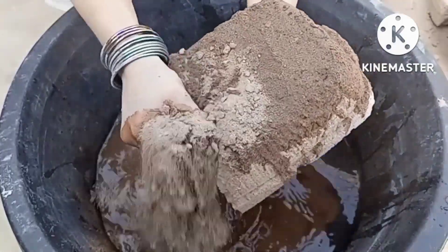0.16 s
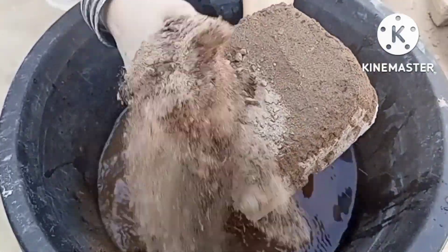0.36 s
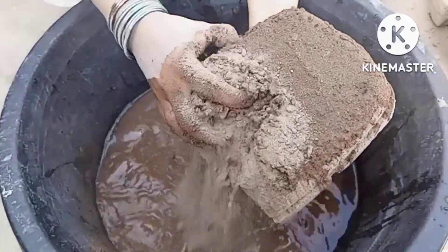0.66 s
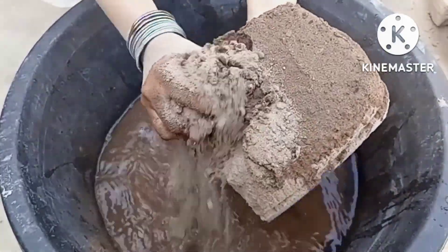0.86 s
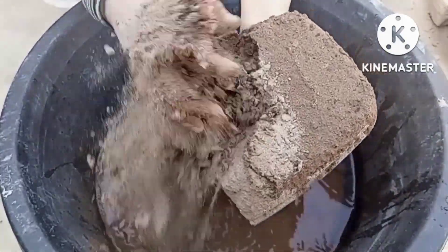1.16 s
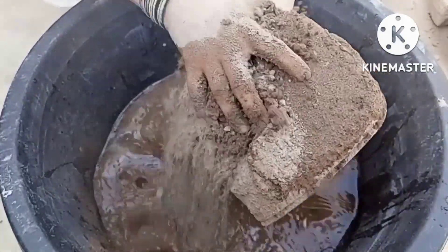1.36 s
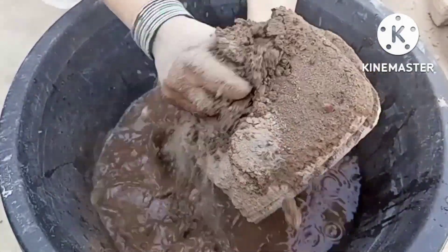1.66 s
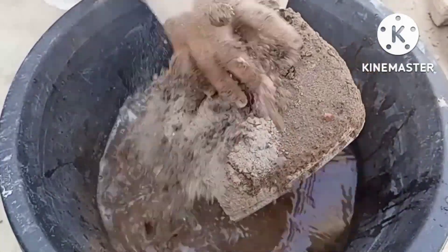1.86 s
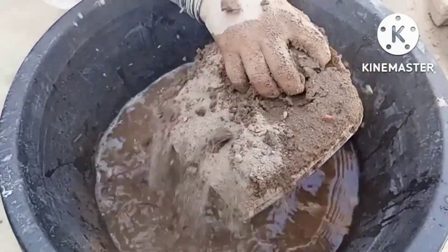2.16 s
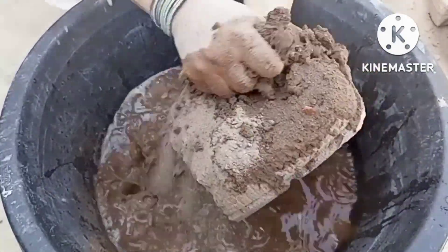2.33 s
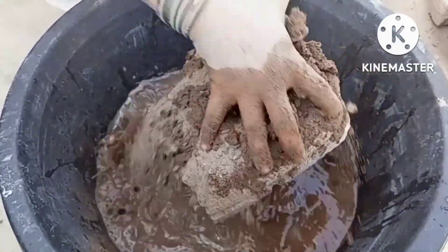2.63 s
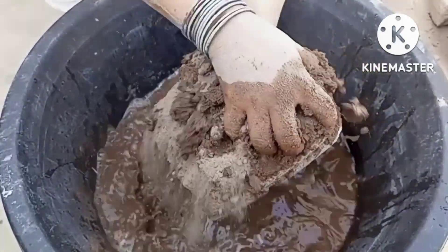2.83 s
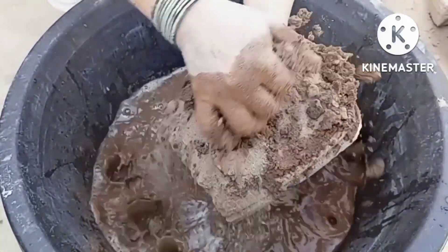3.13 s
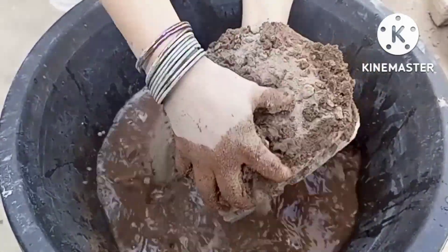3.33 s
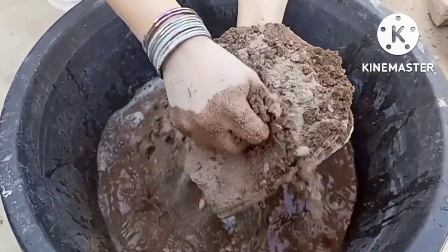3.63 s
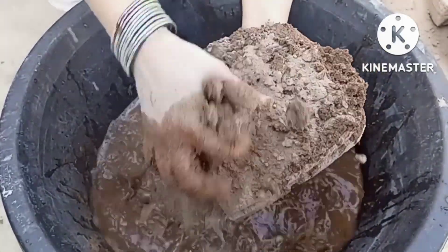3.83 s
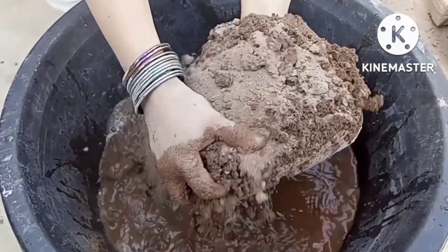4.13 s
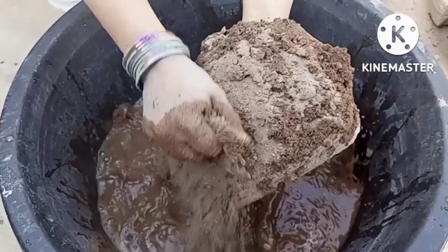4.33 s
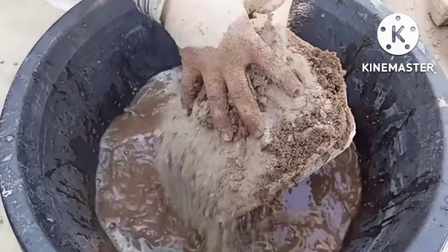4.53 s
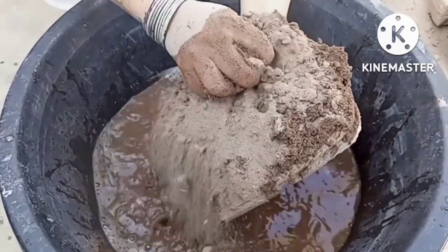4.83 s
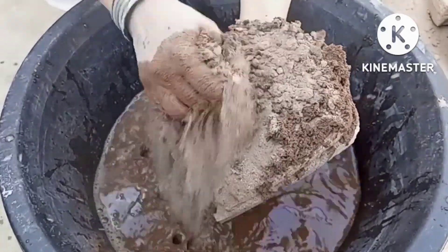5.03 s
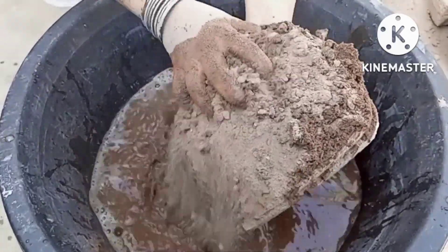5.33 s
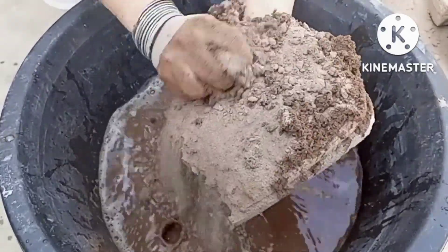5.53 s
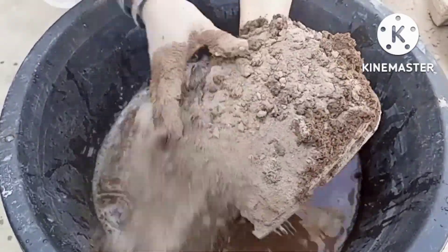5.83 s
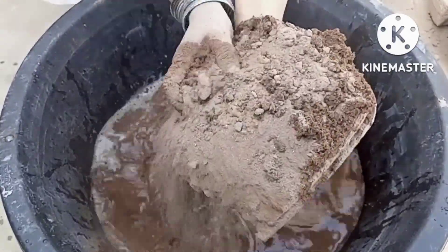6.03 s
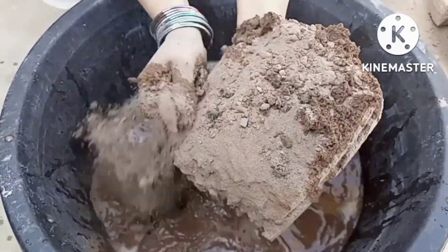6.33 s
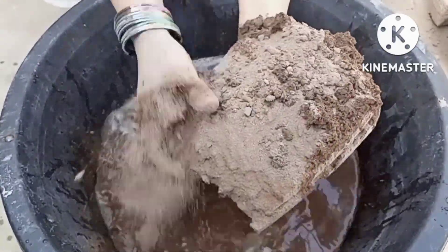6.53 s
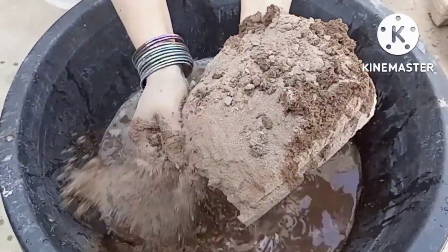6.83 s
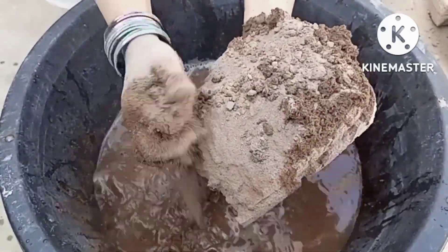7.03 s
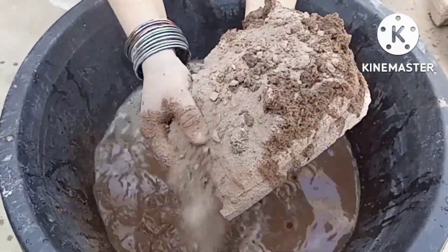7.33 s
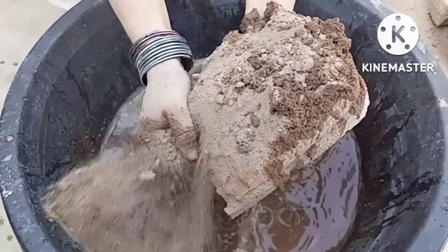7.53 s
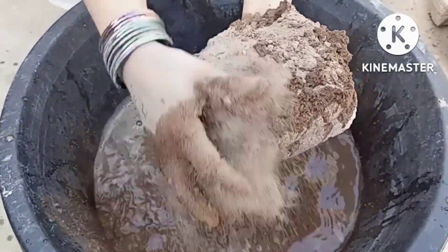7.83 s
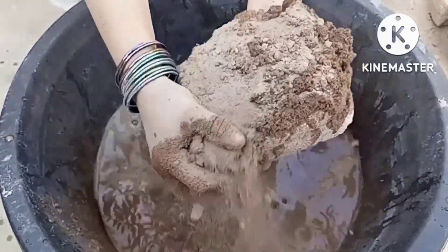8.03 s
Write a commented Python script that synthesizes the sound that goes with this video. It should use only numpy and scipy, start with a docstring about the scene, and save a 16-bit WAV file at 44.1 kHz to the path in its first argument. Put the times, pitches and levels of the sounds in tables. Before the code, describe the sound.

Close to the microphone, a hand breaks up damp sand over a plastic tub of muddy water. Short handfuls of grit crackle and fizz on the surface several times a second, lumps slap and plop with rounded bubbles, and fine sand sifts down in a steady hiss. The splashing is thickest just after two seconds and around six. The tub adds tight echoes; a dull handling rumble and faint low hum sit beneath.

```python
"""Damp sand crumbled into muddy water

A hand crumbles a block of damp sand over a plastic tub of muddy water, close to the microphone. Lumps slap
the surface as coloured noise bursts and trap air bubbles, heard as damped, gliding sines. Handfuls of crumbs
plop and fizz in random swarms of grains and bubbles, and fine sand keeps sifting down with a hiss.
The tub adds echoes and resonances; noise bands give a dull handling rumble and a faint, wavering far hum."""
import sys
import numpy as np
from scipy import signal
from scipy.fft import rfft, irfft, next_fast_len
from scipy.io import wavfile

SR = 44100
rng = np.random.default_rng(int(sys.argv[2]) if len(sys.argv) > 2 else 0)


def pcm_store(signal):
    """Save signal as 16-bit PCM."""
    levels = np.round(np.clip(np.atleast_2d(signal), -1, 1) * 32767)
    wavfile.write(sys.argv[1], SR, levels.astype(np.int16).T)


N = 360738
TIME = np.arange(N) / SR


def from_db(db):
    """Level to amplitude: 20 dB is a factor of ten."""
    return 10 ** (np.asarray(db) / 20)


def rms_one(x):
    """Normalisation: scale each row to unit mean power."""
    return x / np.sqrt(np.mean(x ** 2, axis=-1, keepdims=True) + 1e-20)


def in_time(rows):
    """Linear interpolation: the columns of a time curve at every sample."""
    s, *columns = np.transpose(rows)
    return [np.interp(TIME, s, column) for column in columns]


def at_hz(points, hz):
    """Spectral envelope: gain at the given frequencies, interpolated in dB over log frequency."""
    f, db = np.transpose(points)
    return from_db(np.interp(np.log(hz + 1), np.log(f), db))


def coloured(x, points):
    """Minimum-phase filtering: a causal filter of the given spectrum, then unit power in each row."""
    cepstrum = irfft(np.log(at_hz(points, np.linspace(0, SR / 2, 1025))))
    folding = np.r_[1, np.full(1023, 2), np.zeros(1024)]   # folds the cepstrum onto positive times
    response = irfft(np.exp(rfft(cepstrum * folding)))
    size = next_fast_len(x.shape[-1] + len(response))
    filtered = irfft(rfft(x, size) * rfft(response, size), size)
    return rms_one(filtered[..., :x.shape[-1]])


def add(out, s, sound):
    """Superposition: mix a short sound in, starting at time s."""
    i = round(s * SR)
    first, last = max(i, 0), min(i + len(sound), N)
    if last > first:
        out[first:last] += sound[first - i:last - i]


def swells(rows, attack_s, release_s):
    """Power summation: joint amplitude of gestures (s, length s, dB) that each rise, hold and die away."""
    time = TIME[::64]
    power = 0
    for s, length, db in rows:
        early = np.maximum(s - time, 0)
        late = np.maximum(time - s - length, 0)
        amplitude = from_db(db) * np.exp(-early / attack_s - late / release_s)
        power = power + amplitude ** 2
    return np.interp(TIME, time, np.sqrt(power))


# dull rumble of the handled block and tub: (time [s], level [dB])
RUMBLE = [(0.0, -45.5), (2.55, -62), (2.96, -61), (3.14, -58), (4.49, -53), (5.1, -54.5), (5.24, -56),
          (5.65, -53.5), (5.83, -49.5), (6.72, -54), (7.74, -50), (8.18, -50)]
# the hand shoves the block and jolts the tub: (time [s], length [s], level [dB])
SHOVES = [(2.72, .15, -55), (4.8, .2, -49.5), (5.05, 0.19, -45), (5.46, 0.079, -33.5), (5.64, 0.14, -46)]
SHOVE_ATTACK_S, SHOVE_RELEASE_S = 0.017, .025
# spectrum of the handling: (frequency [Hz], level [dB])
HANDLING_COLOUR = [(25, -16), (50, -15), (75, -3), (150, 0.5), (220, -7), (350, -36), (900, -69)]


def handling_rumble():
    """Structure-borne sound: low noise follows the handling of the block and swells at each shove."""
    handling = from_db(in_time(RUMBLE)[0]) + swells(SHOVES, SHOVE_ATTACK_S, SHOVE_RELEASE_S)
    return handling * coloured(rng.standard_normal(N), HANDLING_COLOUR)


# distant hum: (frequency [Hz], rms level [dB])
HUM = [(70, -57), (139.5, -61.5)]
HUM_WIDTH_HZ = 12


def distant_hum():
    """Narrow-band noise: each resonance passes so thin a band that it hums and wavers."""
    out = np.zeros(N)
    for hz, db in HUM:
        resonance = signal.iirpeak(hz, hz / HUM_WIDTH_HZ, fs=SR)
        out += from_db(db) * rms_one(signal.lfilter(*resonance, rng.standard_normal(N)))
    return out


# handfuls of loosened sand reaching the water:
# (time [s], length [s], grit level [dB], crumbs over grit [dB], fine sand over grit [dB])
HANDFULS = [(0, 0.062, -30.5, 3.5, -4), (0.11, 0.034, -26.5, 3.5, -1.5), (0.235, 0.068, -28.5, 0.5, -7.5),
            (0.363, 0.045, -28.5, 3, -6.5), (0.451, 0.049, -25, 0, -5.5), (0.616, 0.018, -33, 1, -5),
            (0.663, 0.089, -28.5, 3, -7), (0.797, 0.16, -32.5, -11, -5), (1.16, 0.088, -31.5, 1, -4),
            (1.262, 0.05, -28, -4, 0.5), (1.342, 0.094, -31, 0, -5.5), (1.463, 0.13, -29.5, 2, -5),
            (1.625, 0.069, -26.5, 2.5, -8), (1.717, 0.06, -32, 3.5, -5), (2.024, 0.15, -32.5, 5.5, -3),
            (2.197, 0.17, -22, -7.5, -11), (2.353, 0.12, -23.5, -1, -11.5), (2.657, 0.011, -62, -10, 22),
            (2.722, 0.09, -26.5, 4.5, -7), (2.851, 0.08, -33.5, 4.5, -4.5),
            (3.078, 0.031, -38.5, -13, -0.5), (3.122, 0.047, -34.5, -12, -14), (3.231, 0.094, -34, 6, -3),
            (3.399, 0.072, -32, 9, 0), (3.506, 0.048, -38.5, 10.5, 2), (3.799, 0.16, -31, 6.5, -3.5),
            (4.099, 0.11, -30.5, 4.5, -1), (4.169, 0.085, -23, 4.5, -12), (4.276, 0.031, -24, -1.5, 3),
            (4.356, 0.063, -36.5, 6.5, 1), (4.454, 0.083, -25.5, 6, -4), (4.777, 0.06, -31.5, 4.5, -3),
            (4.945, 0.165, -38.5, 11.5, -16), (5.193, 0.026, -31.5, -19, -21), (5.369, 0.067, -33, 1, 0),
            (5.467, 0.11, -33, -5, -8), (5.709, 0.055, -39, 10.5, 2), (6.004, 0.0615, -22.5, -10.5, -11.5),
            (6.076, 0.075, -23, 5.5, -12), (6.178, 0.056, -35.5, 3, -24), (6.475, 0.097, -27, -11.5, -16),
            (6.735, 0.082, -35, 2, -3), (6.853, 0.052, -42.5, 7, -15), (7.083, 0.089, -34.5, -3.5, -8),
            (7.33, 0.088, -38, 5.5, 0), (7.48, 0.09, -33, 0, -2.5), (7.673, 0.11, -24, 1.5, -7),
            (7.984, 0.118, -40.5, -18, 3.5)]
HANDFUL_ATTACK_S, HANDFUL_RELEASE_S = 0.0065, .014
STRAGGLERS_DB, STRAGGLERS_RELEASE_S = -15.5, 0.054   # the last grains trail behind a handful
# fine sand that keeps sifting off the block: (time [s], level [dB])
SIFTING = [(0.0, -38.5), (0.82, -37), (0.96, -37), (1.48, -41), (1.93, -40), (2.3, -39), (2.59, -40.5),
           (3.51, -40), (3.89, -35), (4.35, -40), (4.51, -35), (6.04, -39), (6.22, -41.5), (7.02, -38),
           (7.5, -39.5), (8.18, -37.5)]
SIFTED_CRUMBS_DB, SIFTED_GRIT_DB, SIFTED_SAND_DB = -1, -1.5, 0   # added to the sifting level


def pour():
    """Power summation: levels (dB) of crumbs, grit and fine sand, handfuls on top of steady sifting."""
    s, length, grit_db, crumbs_over_db, sand_over_db = np.transpose(HANDFULS)
    sifting_db, = in_time(SIFTING)
    sizes = [(grit_db + crumbs_over_db, SIFTED_CRUMBS_DB),
             (grit_db, SIFTED_GRIT_DB),
             (grit_db + sand_over_db, SIFTED_SAND_DB)]
    levels = []
    for handful_db, sifted_db in sizes:
        rows = np.transpose([s, length, handful_db])
        handfuls = swells(rows, HANDFUL_ATTACK_S, HANDFUL_RELEASE_S)
        stragglers = from_db(STRAGGLERS_DB) * swells(rows, HANDFUL_ATTACK_S, STRAGGLERS_RELEASE_S)
        sifting = from_db(sifting_db + sifted_db)
        levels.append(20 * np.log10(np.hypot(handfuls + stragglers, sifting)))
    return levels


def impacts(per_s, spread_db):
    """Random arrivals: independent clicks of either sign, many small and few large."""
    sizes = from_db(spread_db * np.minimum(rng.exponential(1, N), 4.5))
    return (rng.random(N) < per_s / SR) * sizes * rng.choice([-1, 1], N)


def bubble(age, hz, decay, swell, glide):
    """Damped oscillator: a bubble swells as its neck closes, then rings down with a rising pitch."""
    rounding = decay / 2
    fall = (np.hypot(age, rounding) - rounding) / decay
    shape = np.exp(-np.where(age < 0, (age / (swell * decay)) ** 2, fall))
    pitch = hz * (1 + glide * np.tanh(age / (3 * decay)))
    cycles = np.cumsum(pitch) / SR + rng.random()
    return shape * np.sin(2 * np.pi * cycles)


def bubble_swarm(clicks, colour, cycles, swell, count):
    """Superposed oscillators: each click starts a small bubble of one of many sizes."""
    out, at = np.zeros(N), np.flatnonzero(clicks)
    pitches = np.geomspace(colour[0][0], colour[-1][0], count)
    dealt = rng.integers(0, count, N)[at]
    for k, hz in enumerate(pitches):
        decay = cycles / hz * rng.uniform(0.44, 2.27)
        age = np.arange(-2 * swell * decay, 6 * decay, 1 / SR)
        ring = rms_one(bubble(age, hz, decay, swell, glide=0.056)) / np.sqrt(len(age))   # unit energy
        ring = at_hz(colour, hz) * ring
        for i in at[dealt == k]:
            out[i:i + len(ring)] += clicks[i] * ring[:N - i]
    return rms_one(out)


def crackle(clicks, colour, decay, variety_db, wash, count):
    """Granular noise: each clot is a brief rush of tiny grains of varied colour, over a finer wash."""
    out, at = np.zeros(N), np.flatnonzero(clicks)
    edges = np.geomspace(colour[0][0], min(colour[-1][0], .45 * SR), count + 1)
    white = rng.standard_normal((2, N))
    tint = rng.standard_normal(N + count)
    fall, rise = np.exp(-1 / (decay * SR)), np.exp(-1 / (0.0001 * SR))
    envelope_poles = np.convolve([1, -fall], [1, -rise])
    for k in range(count):   # one frequency band at a time
        sizes = np.zeros(N)
        sizes[at] = np.abs(clicks[at]) * from_db(variety_db * np.clip(tint[at + k], -2, 2))
        rush = rms_one(signal.lfilter([1], envelope_poles, sizes + 1e-18))
        band = signal.butter(2, edges[k:k + 2], "band", fs=SR, output="sos")
        out += signal.sosfilt(band, white[k % 2] * (rush + wash))
    return coloured(out, colour)


def evened(x, span):
    """Automatic gain: hold the power of a grain stream near one over the span (s), keeping fast crackle."""
    window = signal.windows.hann(max(int(span * SR), 9))
    power = signal.oaconvolve(rms_one(x) ** 2, window / window.sum(), "same")
    return x / np.sqrt(np.mean(x ** 2) * (np.abs(power) + 0.15))


# spectrum of the crumbs: (frequency [Hz], level [dB])
CRUMB_COLOUR = [(230, -5), (330, -11.5), (420, -3), (580, 8), (800, 5), (1100, 7.5), (1400, -4)]


def crumbs(flow):
    """Bubble entrainment: crumbs plop as low bubbles and slosh as low noise bursts."""
    plops = bubble_swarm(impacts(per_s=300 * flow, spread_db=5.0), CRUMB_COLOUR,
                         cycles=3.38, swell=0.57, count=48)
    slosh = crackle(impacts(per_s=200 * flow, spread_db=10.0), CRUMB_COLOUR,
                    decay=0.0039, variety_db=9, wash=0.14, count=5)
    return evened(plops + 0.33 * slosh, span=0.38)


# spectrum of the grit: (frequency [Hz], level [dB])
GRIT_COLOUR = [(1300, 12), (1550, 4.5), (1850, 9.5), (2400, 3.5), (3100, 8), (3900, 3), (4500, 0.5),
               (6000, 1.5), (7400, -4)]


def grit(flow, clots):
    """Impact noise with entrainment: grit crackles among tiny fizzing bubbles."""
    grains = crackle(clots, GRIT_COLOUR, decay=0.0025, variety_db=5.5, wash=0.13, count=9)
    fizz = bubble_swarm(impacts(per_s=1100 * flow, spread_db=6.5), GRIT_COLOUR,
                        cycles=4.5, swell=0.55, count=96)
    return evened(grains + 0.66 * fizz, span=0.23)


# spectrum of the fine sand: (frequency [Hz], level [dB])
SAND_COLOUR = [(5000, -1.5), (7000, 2.5), (8100, -0.5), (9700, 10.5), (11000, 4.5), (12500, -4.5),
               (13900, -5), (15200, 1.5), (16000, 7)]


def fine_sand(flow, clots):
    """Impact noise: the finest sand ticks and hisses on the surface, with a foam of the smallest bubbles."""
    grains = crackle(clots, SAND_COLOUR, decay=0.0029, variety_db=10.5, wash=0.27, count=8)
    foam = bubble_swarm(impacts(per_s=500 * flow, spread_db=7.5), SAND_COLOUR,
                        cycles=20.0, swell=0.24, count=64)
    return evened(grains + 0.38 * foam, span=0.047)


def stream():
    """Random superposition: a heavier stream of sand is denser as well as louder."""
    crumbs_db, grit_db, sand_db = pour()
    flow = from_db(.35 * (grit_db - np.median(grit_db)))
    clots = impacts(per_s=520 * flow, spread_db=6.0)   # each sheds both grit and fine sand
    return (from_db(crumbs_db - 3.1) * crumbs(flow)
            + from_db(grit_db - 2.1) * grit(flow, clots)
            + from_db(sand_db) * fine_sand(flow, clots))


# air bubbles trapped by sinking lumps, levels relative within the layer:
# (time when loudest [s], pitch [Hz], peak level [dB], decay time [cycles])
BUBBLES = [(0.0266, 584, -10, 1.6), (.0322, 764, -14.5, 5.4), (.034, 323, -24, 2.7),
           (0.074, 2060, -25, 6.8), (.121, 537, -12.5, 2.4), (0.1944, 6080, -10.5, 11),
           (0.1967, 531, -4.5, 2.4), (0.2405, 1840, -13.5, 2.1), (.2482, 580, -5, 2.5),
           (.3501, 6300, -17.5, 18), (.3865, 613, -15.5, 4), (.449, 2050, -9, 5.6),
           (0.454, 555, -15.5, 2.2), (0.457, 222, -22, 1.4), (0.4597, 1960, -11, 2.3),
           (.4858, 774, -14, 1.9), (0.6777, 2960, -16.5, 6.4), (.7187, 790, -14, 3.1),
           (.728, 645, -11, 1.6), (.749, 603, -8, 3.8), (.8189, 616, -13, 3.25), (.866, 3280, -17.5, 7.9),
           (0.8928, 1280, -11, 4.8), (.9565, 1326, -16.5, 6.3), (1.0756, 1140, -22, 2),
           (1.186, 1740, -19, 4.2), (1.2689, 502, -1.5, 2.3), (1.309, 625, -21, 2.9),
           (1.3566, 638, -20, 5.8), (1.4903, 560, -14.5, 1.1), (1.5263, 657, -26, 6.2),
           (1.616, 3100, -17.5, 7.2), (1.617, 1686, -15.5, 5.9), (1.656, 3040, -8, 2.5),
           (1.6573, 487, -13, 1.6), (1.9225, 1227, -23, 4.5), (2.0426, 695, -23.5, 3.8),
           (2.102, 653, -13.5, 3), (2.1284, 512, -6.5, 1.44), (2.1497, 3000, -4, 1.2),
           (2.2057, 990, -7.5, 0.69), (2.2344, 3200, -11.5, 2.7), (2.2532, 3310, -4, 4.6),
           (2.255, 8630, -11, 18), (2.3053, 1280, -7.5, 1.6), (2.3368, 3030, -15.5, 11),
           (2.3478, 3050, -10, 3.6), (2.3586, 317, -22, 1.96), (2.3608, 682, -8.5, 2.2),
           (2.3777, 1275, -6.5, 1.7), (2.4188, 1805, -18, 4.9), (2.442, 298, -6, 0.52),
           (2.4592, 330, -14, 0.92), (2.4659, 2290, -10, 6.6), (2.515, 7120, -6, 11),
           (2.5165, 813, -16.5, 4), (2.667, 9430, -29, 95), (2.6972, 2480, -8.5, 4.3),
           (2.699, 864, -15.5, 2.1), (2.7356, 900, -17.5, 1.5), (2.75, 2410, -10.5, 1.9),
           (2.794, 524, -16, 2.4), (2.8528, 950, -15, 2.3), (3.142, 1310, -31.5, 5.9),
           (3.175, 3420, -28.5, 23), (3.196, 4600, -15.5, 6.2), (3.2533, 723, -16, 2.4),
           (3.3302, 666, -23.5, 4), (3.4123, 5330, -14.5, 4.9), (3.7958, 1130, -9.5, 2.4),
           (3.8564, 513, -19, 2.3), (3.9505, 807, -15.5, 4), (4.146, 617, -18, 6), (4.164, 614, -13.5, 1.8),
           (4.2033, 1810, -17, 6.3), (4.242, 1960, -11.5, 2.3), (4.264, 870, -10.5, 1.64),
           (4.4487, 1060, -16, 3.3), (4.525, 534, -9.5, 2.3), (4.683, 650, -15, 3.2),
           (4.7768, 1208, -15, 3.5), (4.8027, 1062, -7.5, 3.3), (4.8046, 356, -10, 0.92),
           (4.806, 528, -4, 2.2), (4.991, 648, -6.5, 3.7), (5.1958, 788, -10.5, 3.7),
           (5.1952, 6030, -26, 21.2), (5.2318, 1890, -10, 2.2), (5.3956, 767, -16, 4.2),
           (5.467, 1120, -19.5, 3.8), (5.486, 2960, -9.5, 1.9), (5.511, 1220, -14.5, 3.8),
           (5.74, 1000, -19.5, 3.4), (5.859, 5700, -8, 6.7), (5.8723, 517, -12.5, 1.8),
           (5.878, 3000, -14, 4), (5.9196, 5020, -5, 4.8), (5.952, 3522, -9, 2.6), (5.968, 3160, -5, 6.9),
           (6.0158, 2440, -4.5, 2.2), (6.0244, 1120, -9.5, 1.77), (6.0245, 1990, -9.5, 2.4),
           (6.1006, 601, -13, 6.7), (6.109, 1100, -18, 2.9), (6.1972, 2480, -19.5, 6.2),
           (6.206, 615, -16.5, 4.2), (6.3354, 1967, -17.5, 6.7), (6.4105, 1114, -14.5, 4.3),
           (6.4924, 1000, -20, 2.4), (6.514, 2625, -14, 15), (6.5288, 2660, -14, 6.9),
           (6.5455, 2270, -9.5, 3.4), (6.546, 3043, -17, 7), (6.568, 2600, -11, 2.6),
           (6.7367, 1500, -20.5, 3.4), (6.8665, 1250, -23.5, 3.7), (6.8874, 860, -22, 4.3),
           (7.015, 5640, -15.5, 6.7), (7.083, 1980, -20, 6.6), (7.118, 5350, -11, 6.4),
           (7.1213, 1107, -16, 1.9), (7.5008, 1180, -16.5, 3.2), (7.6784, 5990, -6.5, 3.6),
           (7.7047, 970, -12, 0.95), (7.7137, 759, -11, 2.5), (7.7637, 785, -15, 1.9)]


def large_bubbles():
    """Damped oscillators: single plops and plinks, each wrapped in a little wet spatter."""
    out = np.zeros(N)
    spatter_colour = [(200, -77), (900, 36.5), (5000, -13), (15000, 12)]   # (Hz, dB)
    spatter = coloured(rng.standard_normal(N), spatter_colour)
    for s, hz, db, cycles in BUBBLES:
        decay = cycles / hz
        age = np.arange(-2 * decay, 8 * decay, 1 / SR)
        add(out, s - 2 * decay, from_db(db) * bubble(age, hz, decay, swell=0.63, glide=0.035))
    envelope = np.abs(signal.hilbert(out, next_fast_len(N))[:N])
    return out + from_db(-23.5) * envelope * spatter


# lumps and drops hitting the water, levels before the part spectra are applied:
# (time [s], crack level [dB], weight: thud over crack [dB], spray over crack [dB])
SPLATS = [(0.1908, -38.5, 23, 7.5), (0.2407, -21, 6, -3.5), (0.342, -42.5, -16, 6),
          (0.421, -24.5, -22, -20), (0.4828, -21, -10, -12), (0.601, -40, 9, 8.5), (0.6137, -30.5, -14, 0),
          (0.6708, -24, -26, -4.5), (.7443, -25, -10, -6), (.8177, -33, 11.5, 0), (.8409, -42, 4, 8),
          (0.8916, -28, 0, -7.5), (0.9305, -26, -1, -10), (0.976, -28.5, -25, -13),
          (1.0658, -33, 1.5, -0.5), (1.1217, -41.5, -25, 3), (1.186, -34.5, 7, 4), (1.2649, -22, 14.5, -16),
          (1.4996, -22, 4, -11.5), (1.6521, -16, -7, -11), (1.6847, -29, 17, -11), (1.7671, -25, -6, -13),
          (1.7764, -30, 6, -3.5), (1.9188, -24, -14.5, -4), (2.1219, -17.5, -1.5, -15),
          (2.2006, -18, -9, -10), (2.2522, -21, -33, -8.5), (2.3588, -24, 2, -29),
          (2.3778, -27.5, 7.5, -4.5), (2.439, -27.5, 19, -5), (2.473, -21.5, 6, -28),
          (2.5141, -20.5, -7.5, 0), (2.5501, -19.5, -14, -22), (2.699, -23.5, -7, -26.5),
          (2.7933, -25.5, 7, -14), (2.8555, -36, 21, -17), (2.9377, -40, 16, 3.5), (2.9945, -22, -14, -22),
          (3.065, -42.5, -19, 5), (3.1727, -41, 13.5, -1), (3.1963, -19.5, -36, -20),
          (3.236, -37.5, 13, 10.5), (3.2533, -27, 2.5, -14), (3.2808, -24.5, -17, -16),
          (3.3553, -24, -3, -15.5), (3.416, -34, -6, 1.5), (3.5732, -23.5, -15, -7.5),
          (3.618, -32.5, -9, -4), (3.8308, -27, 0, -2.5), (3.904, -18.5, -14, -21),
          (3.9795, -23.5, -37, -14), (4.084, -44.5, -8, 10.5), (4.2036, -23.5, 10.5, -7),
          (4.2632, -20.5, 4, -17), (4.2896, -21, 10.5, -7), (4.299, -21.5, 0.5, -0.5),
          (4.3107, -30, -11, 3), (4.421, -49.5, 0, 16.5), (4.5386, -42, 9, -5), (4.8034, -32, 16.5, -1.5),
          (4.9475, -26, 0.5, -11.5), (4.986, -25, -7, -12), (5.03, -25, -22, -11), (5.0655, -21, -1.5, -17),
          (5.074, -29, -16, -12), (5.106, -32, -6, -2.5), (5.1938, -17.5, 3.5, -14),
          (5.2098, -36.5, 17, -6), (5.2308, -29.5, 3.5, -11), (5.3064, -27.5, -6, -8.5),
          (5.4145, -30, -27, -6), (5.485, -23.5, -6, -14), (5.5075, -24, 7, -25), (5.7332, -45, 10, 7),
          (5.8222, -37, 0, 6), (5.8588, -11, -20, -27), (5.905, -27, -4, -13), (5.9186, -17, -28, -15),
          (5.968, -29.5, -13, -4), (6.0157, -26, -3, -30), (6.119, -21, -7, -11), (6.2009, -52, 0, -22),
          (6.4074, -23.5, -16, -27), (6.4888, -34.5, -7, -4), (6.513, -30, -16, -23), (6.742, -51, -10, 11),
          (6.8845, -25.5, -4, -12), (6.9086, -34, 0, -8), (7.0158, -21.5, -15, -9),
          (7.1182, -26.5, -4.5, -12), (7.309, -51, 3, 11.5), (7.384, -32.5, -12, -8),
          (7.525, -28, -4.5, -16.5), (7.6753, -20.5, -19, -14), (7.866, -42.5, 10, 2), (8.0444, -43, 1, 8),
          (8.074, -43, -14, 3.5)]


def splat_part(level_db, colour, decay, tail_db, tail_decay, ring_low_hz, ring_high_hz, ring_db):
    """Transient excitation: grains just ahead, the burst, a tail of droplets and a ringing air pocket."""
    lead = SR // 100
    out, age = np.zeros(N), np.arange(-lead, 4 * lead) / SR
    landing = 1.4 * np.exp(-(age / 0.00073) ** 2) + 0.5 * np.exp(-np.abs(age) / 0.003)
    tail = from_db(min(tail_db, 0))
    sinking = (1 - tail) * np.exp(-np.abs(age) / decay) + tail * np.exp(-np.abs(age) / tail_decay)
    bursts = rng.standard_normal((len(SPLATS), len(age))) * np.where(age < 0, landing, sinking)
    pockets = ring_low_hz * (ring_high_hz / ring_low_hz) ** rng.random(len(SPLATS))
    pockets = np.minimum(pockets, .4 * SR)
    rings = []
    for hz, burst in zip(pockets, bursts):
        resonance = signal.iirpeak(hz, hz / (60 + hz / 25), fs=SR)
        rings.append(signal.lfilter(*resonance, burst))
    bursts = coloured(bursts + from_db(ring_db) * np.array(rings), colour)
    top_db = max(db for hz, db in colour)
    for row, db, burst in zip(SPLATS, level_db, bursts):
        add(out, row[0] + .0005 - lead / SR, from_db(db + top_db) * burst)
    return out


# spectra of a splat's parts, from the push on the water to the finest spray: (frequency [Hz], level [dB])
THUD_COLOUR = [(100, -25), (200, -8), (330, -8), (800, -11.5), (1300, -40.5), (4000, -89)]
SLAP_COLOUR = [(300, -54), (900, -6), (1200, -5.5), (1550, -6.5), (1900, -9), (2500, -6.5), (4000, -15),
               (12000, -60)]
CRACK_COLOUR = [(900, -34), (2400, -16.5), (3100, -10.5), (4000, -17), (6000, -11), (7400, -14.5),
                (9500, -27), (16000, -52)]
SPRAY_COLOUR = [(2000, -57), (5000, 1), (7000, -36.5), (8100, -20.5), (9700, -7), (11000, -15.5),
                (13900, -24.5), (15200, -9)]
SLAP_DB, SLAP_PER_WEIGHT = -6, 0.42   # slap over crack [dB], and its growth per dB of weight


def splats():
    """Impact on a liquid: the push on the water thuds with the longest tail; the spray is briefest."""
    s, crack_db, weight_db, spray_over_db = np.transpose(SPLATS)
    thud_db = crack_db + weight_db
    slap_db = crack_db + SLAP_DB + SLAP_PER_WEIGHT * weight_db
    spray_db = crack_db + spray_over_db
    thud = splat_part(thud_db - 7.5, THUD_COLOUR, decay=0.0065, tail_db=-10.5, tail_decay=0.027,
                      ring_low_hz=200, ring_high_hz=630, ring_db=-16.5)
    slap = splat_part(slap_db, SLAP_COLOUR, decay=0.0073, tail_db=-15.5, tail_decay=0.0053,
                      ring_low_hz=967, ring_high_hz=2550, ring_db=-3.5)
    crack = splat_part(crack_db, CRACK_COLOUR, decay=0.0035, tail_db=-3.5, tail_decay=0.0093,
                       ring_low_hz=2570, ring_high_hz=8000, ring_db=9.5)
    spray = splat_part(spray_db, SPRAY_COLOUR, decay=0.0011, tail_db=-2.5, tail_decay=0.0042,
                       ring_low_hz=7970, ring_high_hz=14300, ring_db=19)
    return thud + slap + crack + spray


# reflections from the tub wall: (delay [s], level [dB])
ECHOES = [(.0031, -27.5), (.0067, -20.5), (.0108, -17.5), (.0172, -23.5), (.0235, -33)]
# resonances of the hollow between water, block and tub wall: (frequency [Hz], width [Hz], level [dB])
TUB = [(333.6, 12, 5.5), (546, 83, -25), (1810, 49, -6.5), (2330, 120, -11.5), (4170, 46, 0.5),
       (5910, 110, -1.5), (10350, 260, -20.5), (14900, 210, -27)]


def tub(x):
    """Reflection and resonance: the wall echoes, the hollow rings, the yard adds a faint diffuse tail."""
    out = x.copy()
    dull = signal.sosfilt(signal.butter(1, 3500, fs=SR, output="sos"), x)
    for delay, db in ECHOES:
        add(out, delay, from_db(db) * dull)
    for hz, width, db in TUB:
        out += from_db(db) * signal.lfilter(*signal.iirpeak(hz, hz / width, fs=SR), x)
    age = np.arange(SR // 4) / SR
    tail = rng.standard_normal(len(age)) * np.exp(-age / 0.018) * (age > .008)
    return out + from_db(-15.5) * signal.oaconvolve(dull, tail / np.linalg.norm(tail))[:N]


WATER_LOW_HZ = 132


def scene():
    """Radiation: water sounds pass through the tub, with their deepest bass taken away."""
    water = from_db(0.74) * large_bubbles() + splats() + from_db(-2.0) * stream()
    water = signal.sosfilt(signal.butter(4, WATER_LOW_HZ, "high", fs=SR, output="sos"), water)
    background = handling_rumble() + distant_hum()
    return (tub(water) + background)[None]


CUTOFF_HZ = 15650


def record(dry):
    """Saturation and band limiting: the highest peaks are rounded off and the top is cut."""
    limited = dry / (1 + dry ** 6) ** (1 / 6)
    return signal.sosfilt(signal.ellip(12, .2, 90, CUTOFF_HZ, fs=SR, output="sos"), limited)


dry = scene()
out = record(dry)
pcm_store(out)
```